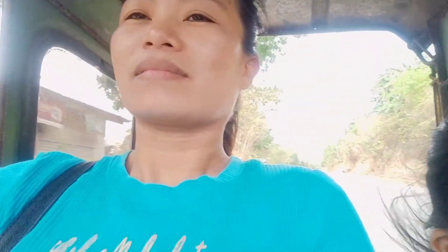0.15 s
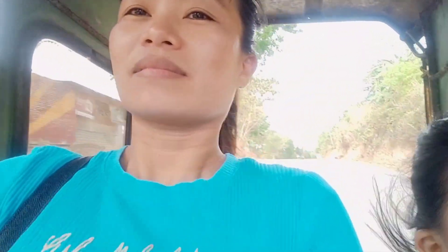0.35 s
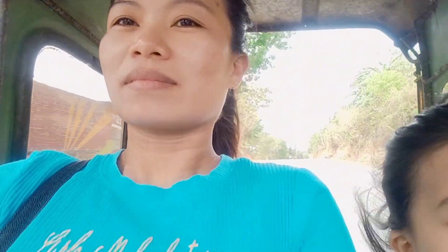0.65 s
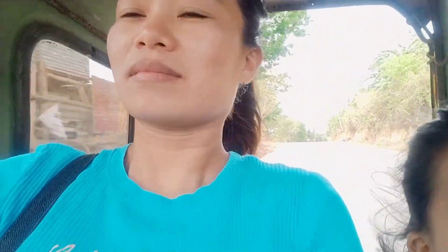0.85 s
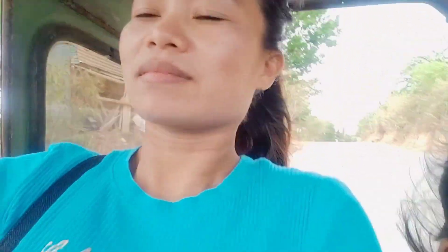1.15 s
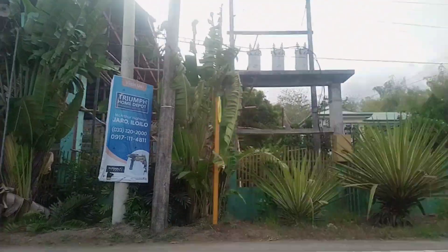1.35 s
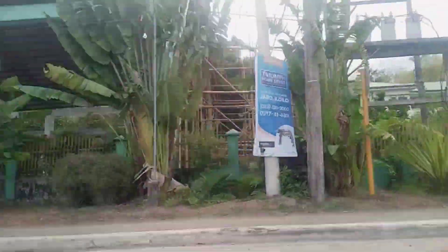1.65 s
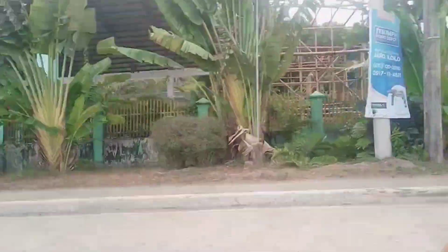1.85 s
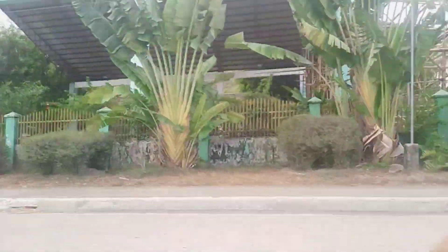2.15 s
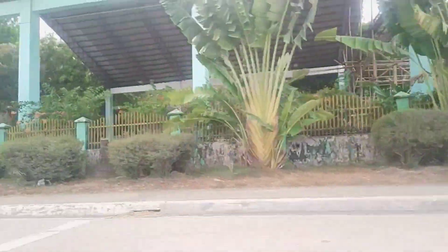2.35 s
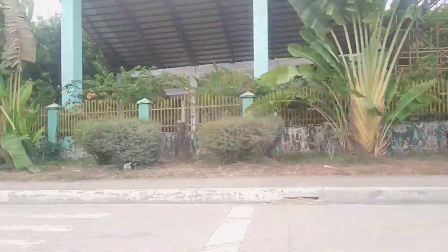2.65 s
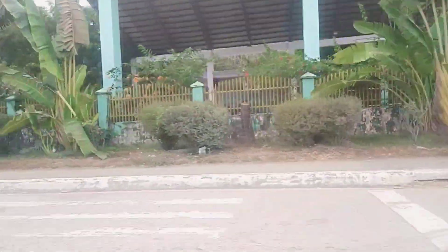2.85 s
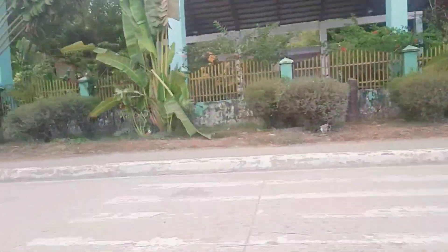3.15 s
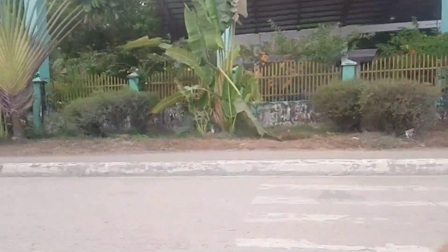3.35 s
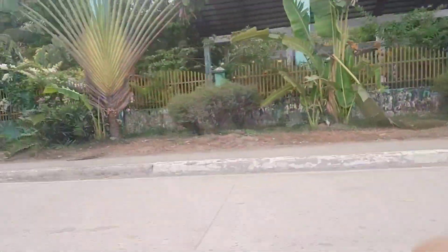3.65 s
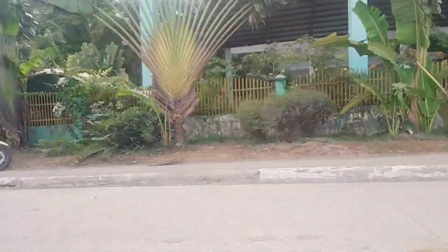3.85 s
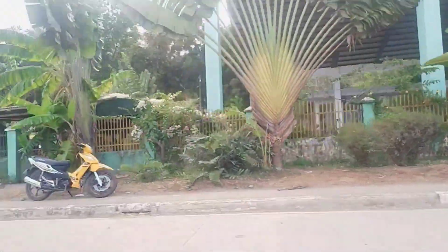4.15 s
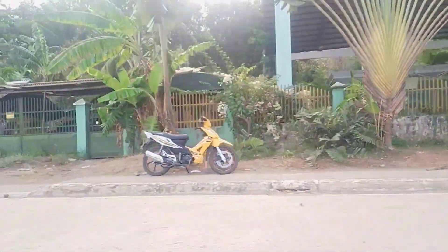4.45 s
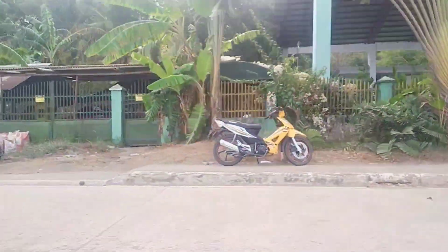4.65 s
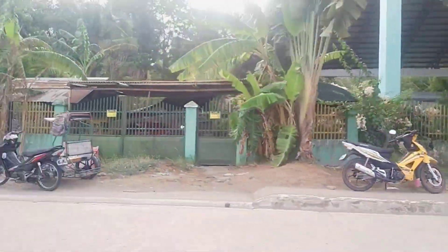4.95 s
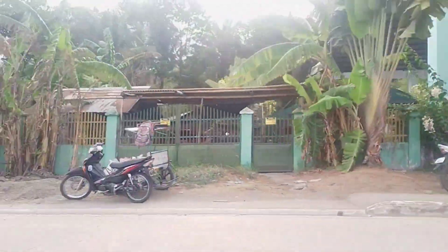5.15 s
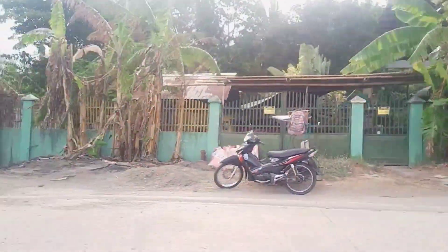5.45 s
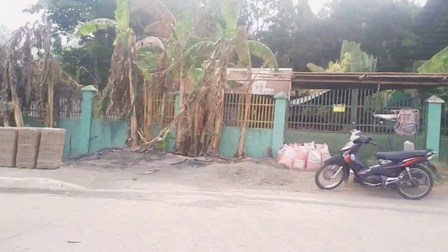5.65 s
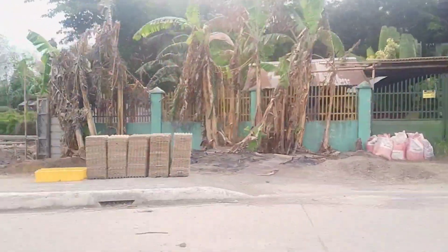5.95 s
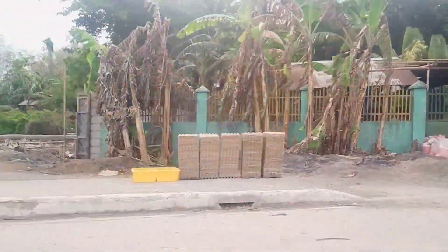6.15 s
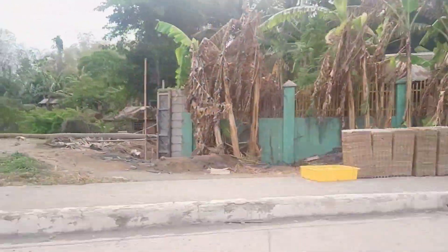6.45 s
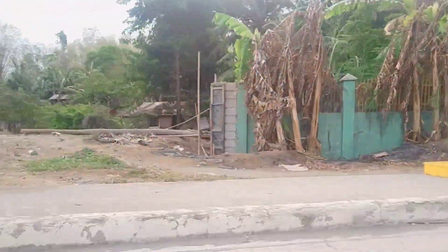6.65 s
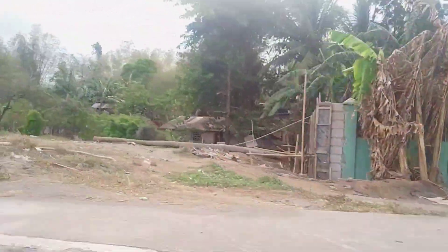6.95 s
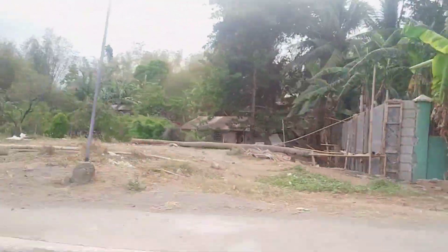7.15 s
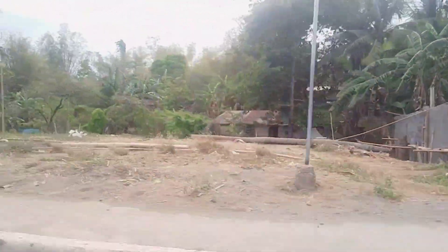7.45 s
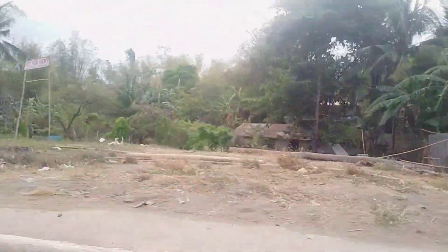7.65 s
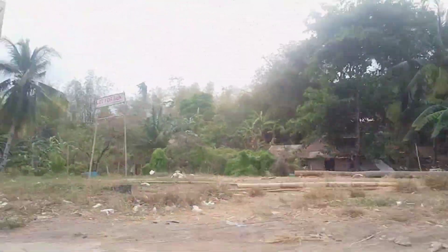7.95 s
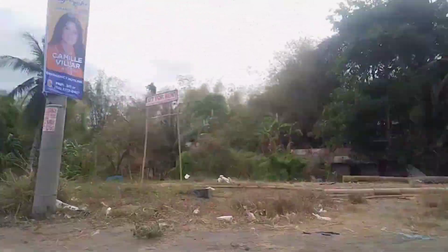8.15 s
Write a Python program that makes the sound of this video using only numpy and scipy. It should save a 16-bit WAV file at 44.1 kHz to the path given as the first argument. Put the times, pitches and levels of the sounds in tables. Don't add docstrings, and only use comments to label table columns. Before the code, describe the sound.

Inside a small open-sided vehicle, a single-cylinder engine runs steadily with bright valve clatter, ringing panels and thin high squeaks. An abrupt silence follows, then the view toward the road brings a lower, throbbing exhaust and duller clatter. Wind thumps the exposed microphone, a bracket pings, a small chain jingles, and loose parts rattle near the end.

```python
import sys
import numpy as np
from scipy import signal
from scipy.fft import rfft, irfft
from scipy.io import wavfile
from scipy.ndimage import uniform_filter1d

SR = 44100
rng = np.random.default_rng(int(sys.argv[2]) if len(sys.argv) > 2 else 0)


def generate_wav(signal):
    frames = np.transpose(np.atleast_2d(signal))
    scaled = np.clip(frames, -1, 1) * 32767
    pcm = np.round(scaled).astype(np.int16)
    wavfile.write(sys.argv[1], SR, pcm)


def decibels_to_gain(level_db):
    exponent = np.asarray(level_db, float) / 20
    return 10 ** exponent


N = 366030


def evened(x):
    return x / np.sqrt(np.mean(x ** 2) + 1e-20)


def read(points, hz):
    f, value = np.transpose(points)
    return np.interp(np.log(hz + 1), np.log(f + 1), value)


def curve(points, t):
    return np.interp(t, *np.transpose(points))


def add(mix, s, sound):
    part = mix[round(s * SR):][:len(sound)]
    part += sound[:len(part)]


def filtered(x, db_at):
    return irfft(rfft(x) * decibels_to_gain(db_at(np.fft.rfftfreq(len(x), 1 / SR))), len(x))


def swell(count, size):
    once = uniform_filter1d(rng.standard_normal(count), size=size)
    return evened(uniform_filter1d(once, size=size))


def noise(count, db_at, patchy_db, size=1024):
    hz = np.fft.rfftfreq(size, 1 / SR)
    real, imag, patches = rng.standard_normal((count * 4 // size + 5, len(hz), 3)).T
    patches = uniform_filter1d(patches, size=10, axis=0)
    patches = evened(uniform_filter1d(patches, size=10, axis=1))
    spectra = (real + 1j * imag) * decibels_to_gain(db_at(hz)[:, None] + patchy_db * patches)
    _, sound = signal.istft(spectra, nperseg=size, noverlap=size * 3 // 4)
    return evened(sound[:count])


def mode(hz, t60):
    t = np.arange(6000) / SR
    return decibels_to_gain(-60 * t / t60) * np.sin(2 * np.pi * hz * t)


def wind(count, colour, lump_db, size):
    air = noise(count, lambda hz: read(colour, hz), patchy_db=1.0, size=2048)
    air = air * decibels_to_gain(lump_db * swell(count, size))
    slow_power = uniform_filter1d(air ** 2, size=4000)
    return evened(air / np.sqrt(slow_power + .05))


def gusts(t):
    # centre in seconds, length in seconds, rumble lift in dB, buffet lift in dB.
    gust_rows = [(0.566, 0.039, 5, 5.5), (1.018, 0.046, 5, 5), (1.118, 0.045, -2, 1), (2.617, 0.045, 6, 8),
                 (2.796, 0.16, 1.5, 4.5), (2.944, 0.21, 2.5, 5), (3.196, .05, -1, 1),
                 (3.537, 0.063, 8, 8.5), (3.669, 0.026, 8, 13), (3.75, 0.082, 9, 10),
                 (3.894, 0.05, 11, 15.5), (4.001, 0.042, 12, 13.5), (4.12, 0.11, 0, 6), (4.39, .04, 4, 7),
                 (4.525, 0.066, 0, 7.5), (4.627, 0.034, 10, 13), (4.996, 0.038, -2, 4),
                 (5.245, 0.051, 1, 6), (5.603, 0.1, 3, 3), (5.765, .04, 2, -4), (6.2, 0.075, -4, 11),
                 (6.3, 0.069, 5, 6), (6.446, 0.062, -3, 8), (6.576, 0.076, 3, 9.5), (6.73, 0.029, 9, 10),
                 (7.534, 0.036, 13, -1), (7.913, 0.096, 10, 9), (7.997, 0.068, 9.5, 0.5),
                 (8.104, 0.038, 8, -16)]
    return sum(np.outer((rumble_db, buffet_db), np.exp(-((t - s) / length) ** 2 * 2))
               for s, length, rumble_db, buffet_db in gust_rows)


def pop(s, db, hz):
    cycles = np.arange(800) / SR * hz
    shape = np.minimum(cycles / 0.15, 1) * np.exp(-cycles / 0.91)
    return s, decibels_to_gain(db - 8.5) * np.sin(2 * np.pi * cycles) * shape


def jingle(s, db, hz):
    ticks = rng.standard_normal(900) * (rng.random(900) < .05) * np.exp(-np.arange(900) / 400)
    links = mode(hz, .012) + mode(hz * 1.08, .009) + mode(hz * .93, .009)
    ring = np.convolve(ticks, links[:600])
    return s, decibels_to_gain(db + 4.0) * ring / abs(ring).max()


def ping(s, db):
    bracket_hz, bracket_t60, spread = 3430, 0.038, .008
    low, high = bracket_hz * (1 + spread * rng.standard_normal(2))
    tick = np.diff(rng.standard_normal(1501)) * np.exp(-np.arange(1500) / 90)
    ring = mode(low, bracket_t60) + .6 * mode(high, bracket_t60)
    return s, decibels_to_gain(db - 1.0) * (ring[:1500] + .15 * tick)


def squeak(s, length, hz, db):
    t = np.arange(round((length + 0.009) * SR)) / SR
    waver = evened(uniform_filter1d(rng.standard_normal(len(t)), size=150))
    shape = np.minimum(t / .002, 1) * np.exp(-np.maximum(t - length, 0) / .003) * decibels_to_gain(2.5 * waver)
    return s, decibels_to_gain(db) * shape * np.sin(2 * np.pi * np.cumsum(hz + 40 * waver) / SR)


def rattle(s, length, db, hz):
    # frequency in Hz, level in dB.
    port = [(1000, 13.5), (4000, -1), (7500, -5), (9500, -3.5), (13000, 7), (16000, -2)]
    u = np.arange(round((2 * length + 0.0081) * SR)) / SR / length
    strength = np.repeat(rng.exponential(1, len(u)), 40)[:len(u)].clip(0, 4)
    ticks = rng.standard_normal(len(u)) * decibels_to_gain(2.0 * strength)
    band = filtered(ticks, lambda f: read(port, f) - 5.0 * np.log2((f + 1) / hz) ** 2)
    shape = np.minimum(u / .3, 1) * np.exp(-.6 * u - np.maximum(u - 1, 0) / .2)
    return s, decibels_to_gain(db) * shape * evened(band)


def per_cycle(turns, spread_db):
    gains = decibels_to_gain(spread_db * np.clip(rng.standard_normal(400), -1.8, 1.8))
    return gains[np.floor(turns).astype(int) + 2]


def shaken(turns, knocks, hz, t60, per_s):
    chance = sum(np.exp(-((turns - at) % 1) / .12) for at, _, _ in knocks) + .3
    ticks = (rng.random(len(turns)) < per_s * chance / SR) * rng.standard_normal(len(turns))
    return evened(signal.oaconvolve(ticks, mode(hz, t60))[:len(turns)])


def clatter(turns, colour, panels, knocks, rings, tilt, treble_db):
    def body(hz):
        panels_db = sum(db / (1 + (2 * (hz - f) / width) ** 2) for f, width, db in panels)
        return read(colour, np.minimum(hz, 15600)) + panels_db - 40 * (hz < 280)

    blows = sum(decibels_to_gain(db) * per_cycle(turns - at, spread_db=1.6) * np.exp(-((turns - at) % 1) / decay)
                for at, db, decay in knocks)
    sharp = noise(len(turns), lambda hz: body(hz) + read(tilt, hz), patchy_db=1.5)
    wash = noise(len(turns), body, patchy_db=1.2)
    metal = evened(wash + 1.5 * uniform_filter1d(blows, size=80) * sharp)
    treble = filtered(metal, lambda hz: -60 / (1 + (hz / 4500) ** 4))
    ringing = sum(decibels_to_gain(db) * shaken(turns, knocks, hz, t60, per_s=400) for hz, db, t60 in rings)
    return metal + (decibels_to_gain(treble_db - treble_db.mean()) - 1) * treble + ringing


def orders(turns, table, delay):
    return sum(decibels_to_gain(db) * np.cos(2 * np.pi * k * (turns - delay)) for k, db in table)


def exhaust(turns, pipe, blow):
    late = turns + .02 * np.log(uniform_filter1d(per_cycle(turns, spread_db=2.0), size=500))
    ring = sum(orders(late, [row], .5) * uniform_filter1d(per_cycle(turns, spread_db=.7), size=500)
               for row in pipe)
    blow_gain = uniform_filter1d(per_cycle(turns + .2, spread_db=3), size=200)
    pulse = orders(late, blow, .28) * blow_gain - ring
    return evened(pulse * uniform_filter1d(per_cycle(turns, spread_db=1.1), size=300))


def engine_and_wind(speed, start_turn, pipe_and_blow, metal, levels_db):
    # frequency in Hz, level in dB per Hz.
    rumble_colour = [(15, 7.5), (25, 4.5), (60, 1), (110, 1), (200, -3.5), (300, -45)]
    buffet_colour = [(60, -18), (130, 0.5), (220, 0.5), (350, -9), (600, -13.5), (1200, -22.5), (2500, -65)]
    # time in seconds, level in dB.
    shake = [(0, -0.5), (.3, -0.5), (.64, -1), (.85, -0.5), (1.1, 0.5), (1.31, 1), (2.02, 1.5), (2.2, -1.5),
             (2.64, 0), (2.8, -1), (3.5, -0.5), (4.1, 0), (4.98, 1.5), (5.15, 0.5), (5.8, 1), (6.6, 0.5),
             (7.6, 3), (8.3, 2)]
    airstream = [(0, 3), (.25, -4), (.55, -4), (.9, -1.5), (1.12, -4), (1.31, -2.5), (2.02, -5.5),
                 (2.4, -6), (2.75, 0.5), (3.6, -4), (4.5, 0.5), (5.3, -6), (5.62, 6.5), (5.92, -3.5),
                 (6.4, 7), (7.05, -12), (7.9, 1.5), (8.15, -6)]
    throttle = [(0, 1.5), (.3, -0.5), (.5, -2), (.95, -0.5), (1.05, 2.5), (1.31, 3), (2.02, -1),
                (2.6, -0.5), (3.4, 0), (4.0, 0.5), (4.9, 0.5), (6.1, 0.5), (6.5, -1), (7.1, 1), (7.3, -2),
                (7.65, 2), (8.04, -3), (8.26, 1)]

    t = np.arange(speed[0][0], speed[-1][0], 1 / SR)
    count = len(t)
    turns = start_turn + np.cumsum(curve(speed, t)) / SR
    shake_db, air_db = curve(shake, t), curve(airstream, t)
    fence_loss_db = 3 * np.clip((t - 6.8) / 0.24, 0, 1)
    treble_db = 0.36 * shake_db - fence_loss_db + .6 * swell(count, size=2000)
    rumble_db, buffet_db = gusts(t)
    curves_db = (shake_db + .5 * swell(count, size=2000),
                 curve(throttle, t) + 0.17 * swell(count, size=2000),
                 air_db + rumble_db + 1.6 * swell(count, size=1500),
                 0.24 * air_db + buffet_db + 1.5 * swell(count, size=700))
    layers = (clatter(turns, *metal, treble_db),
              exhaust(turns, *pipe_and_blow),
              wind(count, rumble_colour, lump_db=4.5, size=1500),
              wind(count, buffet_colour, lump_db=2.0, size=400))
    return t[0], sum(decibels_to_gain(c + db) * x for c, db, x in zip(curves_db, levels_db, layers))


def cab_side(speed, start_turn):
    # multiple of the firing rate, level in dB.
    pipe = [(1, -18), (2, -16), (3, -12), (4, -15), (5, 0), (6, -16), (7, -26), (8, -26)]
    blow = [(10, -23), (12, -31), (17, -30), (26, -32)]
    # frequency in Hz, level in dB per Hz.
    colour = [(180, -42), (300, -4.5), (404, -28), (469, -12.5), (664, -10), (722, -9), (910, -11.5),
              (1740, -6), (2220, -12), (2420, 1), (5010, -24.5), (7330, -14.5), (8940, -24.5),
              (13300, -15.5), (15700, -16.5)]
    # frequency in Hz, width in Hz, dB above the colour.
    panels = [(1290, 40, 0.5), (1440, 49, 3), (1760, 80, 5), (2050, 35, 11), (2280, 110, 3.5),
              (2634, 210, -6.5), (3080, 80, -0.5), (4730, 43, 0), (5290, 50, 1.5), (9650, 40, -6.5),
              (10400, 83, -14.5)]
    # place in turns, level in dB, decay in turns.
    knocks = [
        (.02, 5.5, .085),
        (.31, 3.5, .16),
    ]
    # frequency in Hz, level in dB, t60 in seconds.
    rings = [(1750, -15, .035), (2089, -20, .03), (2450, -16, .03), (2373, -19, .03), (2670, -22, .04),
             (4730, -31, .06), (5290, -29, .05), (13000, -23, .05), (9645, -33, .07), (1100, -25, .05)]
    # frequency in Hz, dB against the clatter.
    tilt = [(300, -18), (1000, -12), (2000, -6), (3500, -6), (10500, -7), (12500, 1.5), (16000, 2)]
    return engine_and_wind(speed, start_turn, (pipe, blow), (colour, panels, knocks, rings, tilt),
                           levels_db=(-19.5, -23.5, -24, -30.5))


def road_side(speed, start_turn):
    # multiple of the firing rate, level in dB.
    pipe = [(1, -21), (2, -20), (3, -28), (4, -3.5), (5, 0), (6, -3), (7, -19), (8, -19)]
    blow = [(10, -21), (11, -26), (12, -30), (13, -21), (14, -24), (16, -25), (17, -27), (18, -29),
            (20, -24), (23, -33), (24, -29), (28, -34), (35, -31)]
    # frequency in Hz, level in dB per Hz.
    colour = [(180, -30), (300, -4), (580, -11.5), (840, -6), (1550, -10), (2000, -10), (2630, -13.5),
              (3420, -19), (4770, -25), (8200, -21.5), (9200, -29), (11400, -25), (14800, -15),
              (15700, -20.5)]
    # frequency in Hz, width in Hz, dB above the colour.
    panels = [(531.6, 31.5, 11.5), (663, 68, 9.5), (1024, 210, 4.5), (1283, 194, 4), (1796, 110, 2.5),
              (2880, 170, 1.5), (6300, 1800, -2.5), (3930, 480, 2)]
    # place in turns, level in dB, decay in turns.
    knocks = [
        (.0, -7, .15),
        (.28, -9, .12),
        (.46, -6, .14),
    ]
    # frequency in Hz, level in dB, t60 in seconds.
    rings = [(330.6, -11.5, 0.24), (563, -25, 0.2), (651, -15.5, 0.096), (957, -13, 0.1),
             (1414, -13.5, 0.074), (1968, -14, 0.067), (2988, -23, 0.14), (3416, -24.5, .035)]
    # frequency in Hz, dB against the clatter.
    tilt = [(300, -9), (1500, -3.5), (3500, -4), (9000, -6), (12500, -7), (16000, -7)]
    return engine_and_wind(speed, start_turn, (pipe, blow), (colour, panels, knocks, rings, tilt),
                           levels_db=(-25, -17.0, -26.0, -27.5))


def scene():
    # time in seconds, firings per second.
    speeds = [
        [(0.0, 27.72), (0.329, 27.777), (0.657, 27.565), (0.986, 27.53), (1.314, 26.862)],
        [(2.016, 27.458), (2.914, 27.449), (3.811, 27.32), (4.709, 27.311), (5.607, 27.121), (6.505, 27.188),
         (7.402, 27.129), (8.3, 27.017)],
    ]
    start_turns = [-.072, .009]
    # start in seconds, peak in dB, frequency in Hz.
    pop_rows = [(2.72, -23, 339), (2.786, 5, 300), (2.829, 0, 550), (2.841, 1, 315), (2.93, 0, 450),
                (2.974, -2, 620), (3.5, -2, 302), (3.545, -3, 332), (3.848, -6, 400), (4.055, -8, 350),
                (2.857, 5, 400), (3.408, 3, 340), (3.525, 5, 219), (3.661, 0, 220), (3.762, 1, 241),
                (3.878, 3, 420), (3.99, 4, 204), (4.212, -4, 336), (4.503, -4, 336), (4.612, 5.5, 372),
                (4.988, -5, 450), (5.239, -9, 330), (5.655, -38, 266), (5.852, -6, 312), (6.175, -2, 210),
                (6.23, -2, 326), (6.343, -4, 277), (6.412, -14, 342), (6.559, -5, 205), (6.859, -2, 331),
                (6.897, -10, 307), (6.97, -7, 369), (7.079, -13, 312), (7.449, -21, 336), (7.67, -6, 328),
                (7.892, -23, 310), (8.225, -9, 336)]
    # start in seconds, peak in dB, frequency in Hz.
    jingle_rows = [(2.3079, -33, 8480), (2.6416, -27, 8130), (2.8317, -29, 7800), (3.2343, -32, 7820),
                   (3.5475, -30, 7740), (3.9865, -35, 7390), (4.0334, -30, 7730), (4.3851, -28, 7440),
                   (4.425, -28, 7180), (4.463, -30, 7970), (4.5348, -26, 7690), (4.7927, -28, 7950),
                   (5.0142, -30, 7960), (5.092, -28, 7910), (5.1943, -28, 7100), (5.2841, -30, 7060),
                   (5.4233, -31, 7990), (5.5335, -27, 7770), (5.7336, -28, 7500), (6.1127, -35, 7800),
                   (6.3048, -34, 8130), (6.4854, -34, 8370), (7.0002, -31, 8140), (7.2197, -25.5, 7600),
                   (7.3848, -25, 7460), (7.515, -32, 7880), (7.5744, -29, 7810), (7.718, -21, 7510),
                   (7.7709, -25, 7490), (7.8992, -30, 7750), (7.958, -27, 8330), (7.9874, -26, 6700)]
    # start in seconds, level in dB.
    ping_rows = [(4.0617, -36), (4.349, -37), (4.3865, -35), (4.4244, -33), (4.4982, -30), (4.5341, -27),
                 (4.6838, -36), (4.8813, -33), (4.9382, -32), (4.9766, -30), (5.1198, -41), (5.1562, -43),
                 (5.1941, -32), (5.247, -32), (5.3592, -36), (5.5069, -33), (5.5807, -31), (5.7114, -37),
                 (5.7484, -28), (5.8022, -27), (5.8915, -36), (5.9689, -27), (6.0058, -35), (6.0237, -30),
                 (6.1135, -31), (6.1519, -34), (6.2063, -33), (6.2991, -35), (6.3729, -34), (6.4054, -36),
                 (6.4468, -29), (6.4812, -35), (6.5206, -30), (6.555, -29), (6.6289, -29), (6.668, -28),
                 (6.7406, -32), (6.7576, -31), (6.8314, -25), (6.8878, -27), (6.9416, -25), (6.999, -30),
                 (7.0349, -29), (7.1447, -28), (7.218, -25), (7.2569, -21), (7.2933, -29), (7.3323, -24),
                 (7.3841, -26), (7.4226, -39), (7.4585, -27), (7.4764, -27), (7.5138, -24), (7.5498, -31),
                 (7.5887, -25), (7.678, -25)]
    # start in seconds, length in seconds, frequency in Hz, level in dB.
    squeak_rows = [(0.15, .035, 13000, -36), (.22, .02, 13000, -35), (.255, 0.093, 13000, -28),
                   (.29, .04, 9650, -39), (.397, 0.032, 13000, -28), (.578, 0.019, 13000, -34),
                   (2.264, .006, 10900, -36), (3.283, .016, 10100, -40), (6.556, 0.035, 1990, -25.5),
                   (3.4, .08, 2200, -34), (1.2, .01, 13000, -15), (1.13, .008, 13000, -28),
                   (1.145, 0.0092, 13200, -17), (1.12, .02, 9650, -40.5)]
    # start in seconds, length in seconds, level in dB, centre in Hz.
    rattle_rows = [(7.7175, 0.014, -24.5, 5000), (7.745, .002, -30, 3500), (7.7675, .01, -27, 7500),
                   (7.785, .014, -31, 6000), (7.899, .008, -31, 4000), (7.957, .01, -30, 5000),
                   (7.986, 0.028, -18.5, 3800), (8.015, .02, -26, 3000), (8.028, 0.0017, -24, 12000),
                   (8.0435, .0015, -11, 3000), (8.058, 0.048, -18.5, 3800), (8.0705, .006, -19, 4500),
                   (8.085, .014, -24, 3000), (8.126, 0.0016, -19, 6000), (8.171, .002, -28, 3500),
                   (8.234, 0.016, -25.5, 4500), (8.278, .008, -31, 6000)]

    mix = np.zeros(N)
    add(mix, *cab_side(speeds[0], start_turns[0]))
    add(mix, *road_side(speeds[1], start_turns[1]))
    for rows, source in ((pop_rows, pop), (jingle_rows, jingle), (ping_rows, ping),
                         (squeak_rows, squeak), (rattle_rows, rattle)):
        for row in rows:
            add(mix, *source(*row))
    return mix[None]


def gain_control(t):
    # start in seconds, depth in dB (negative lifts the level), recovery in seconds.
    dip_rows = [(.18, 2.5, 0.034), (.47, -2.5, 0.069), (.63, 2, 0.041), (.97, 2, 0.022), (2.33, -2, 0.051),
                (2.7, 2, 0.099), (3.07, -2.5, 0.07), (3.28, -1.5, 0.068), (3.67, 5.5, 0.078),
                (3.77, 3, 0.064), (3.877, 8.5, 0.1), (4.3, 3, 0.068), (4.56, 3.5, 0.076), (4.616, 6, 0.1),
                (4.93, -2.5, .06), (5.05, 1, 0.043), (5.33, 1.5, 0.08), (5.64, 3, 0.061),
                (5.86, -2.5, 0.032), (6.247, 7, 0.08), (6.5, 0, 0.033), (6.63, 0.5, .05),
                (6.95, -0.5, 0.059), (7.27, 1, 0.066), (7.44, 4.5, 0.076), (7.829, 4, 0.11),
                (7.999, 3.5, 0.1), (8.101, 3.5, 0.099)]
    dip_db = np.zeros(len(t))
    for s, depth_db, recovery in dip_rows:
        since = np.maximum(t - s, 0)
        dip_db += depth_db * np.minimum(since / 0.004, 1) * np.exp(-(since / recovery) ** 2)
    return decibels_to_gain(-dip_db)


def top_cut(x):
    return signal.sosfilt(signal.butter(12, 17000, fs=SR, output="sos"), x)


def record(dry):
    gap_start, gap_end = (1.3145, 2.0165)
    t = np.arange(N) / SR
    offset = -.065 * np.exp(-np.maximum(t - gap_end, 0) / 0.46) * (t > gap_end)
    limited = 0.56 * np.tanh((dry * gain_control(t) + offset) / 0.61)
    gated = limited * ((t < gap_start) | (t > gap_end))
    edge = signal.firwin(1023, 15740, window=("kaiser", 10), fs=SR)
    return top_cut(signal.oaconvolve(gated, edge[None], "same"))


dry = scene()
out = record(dry)
generate_wav(out)
```